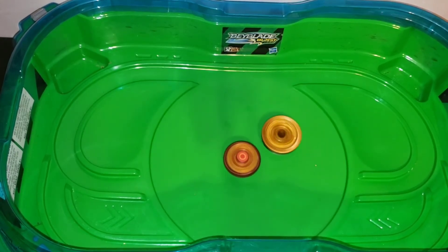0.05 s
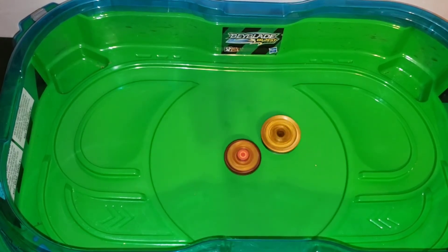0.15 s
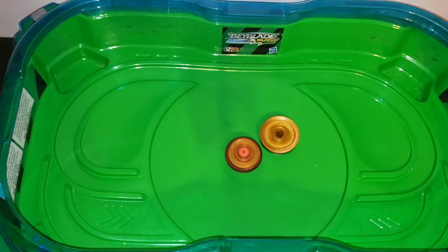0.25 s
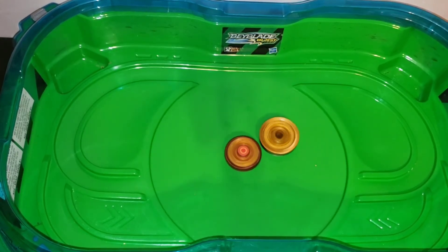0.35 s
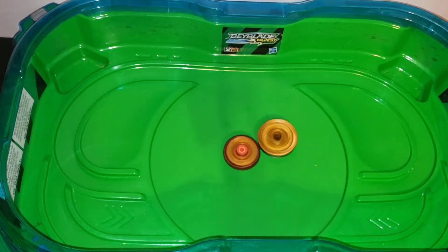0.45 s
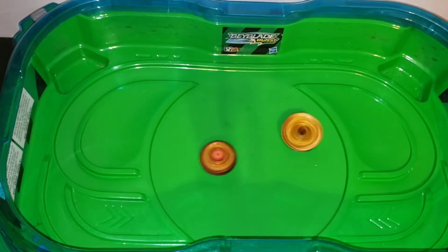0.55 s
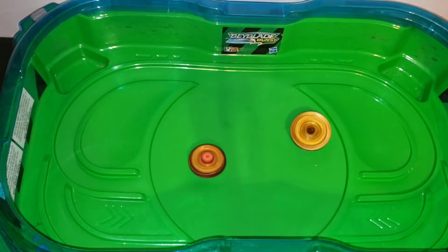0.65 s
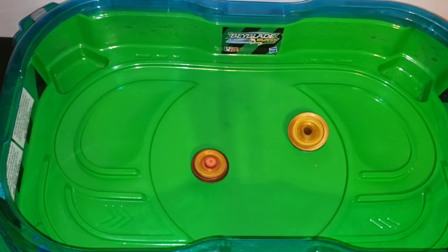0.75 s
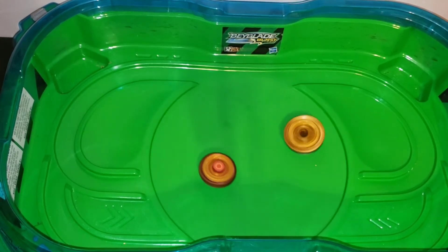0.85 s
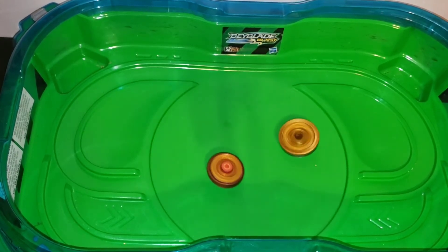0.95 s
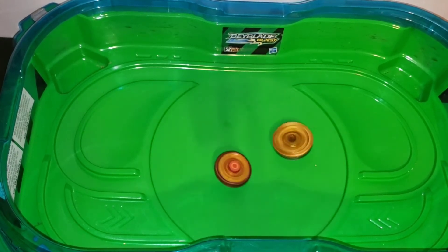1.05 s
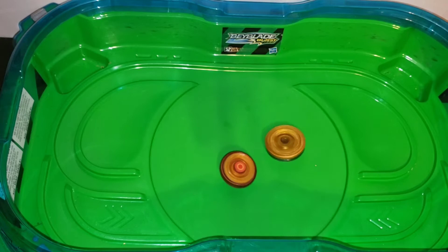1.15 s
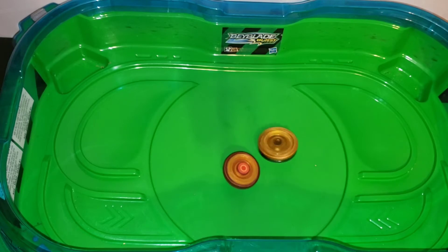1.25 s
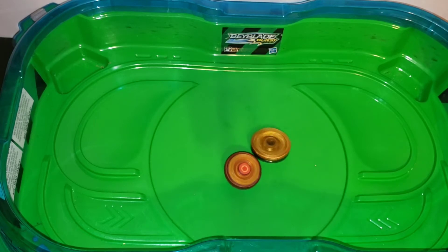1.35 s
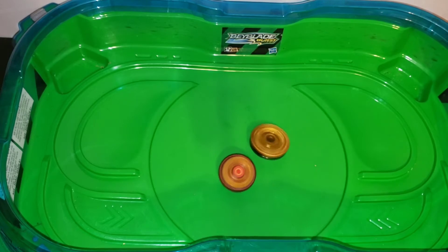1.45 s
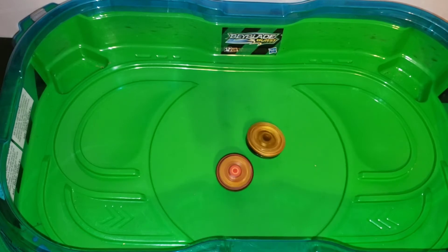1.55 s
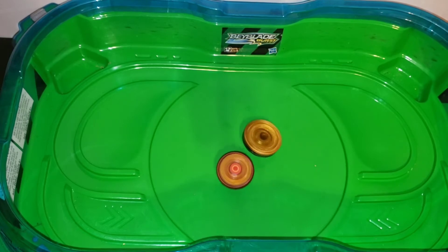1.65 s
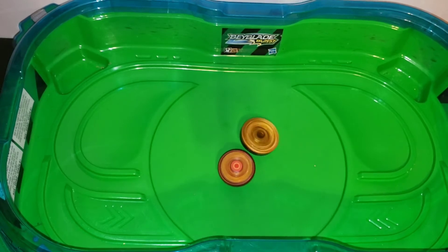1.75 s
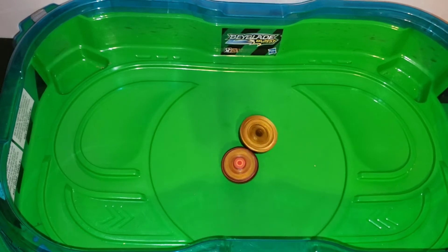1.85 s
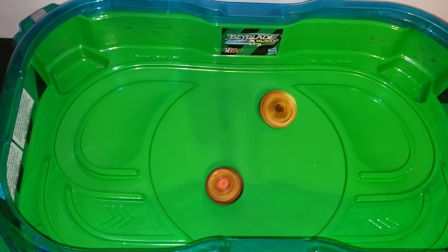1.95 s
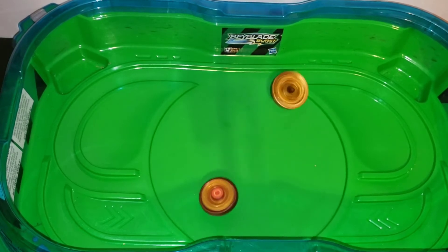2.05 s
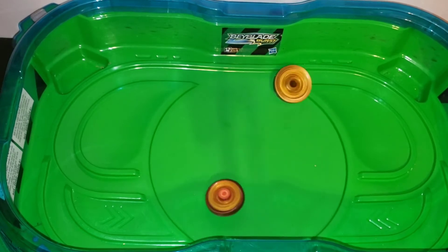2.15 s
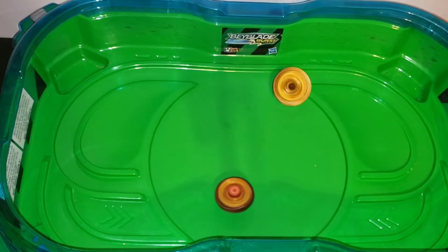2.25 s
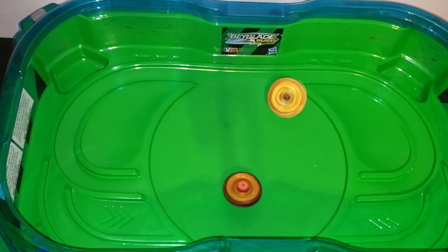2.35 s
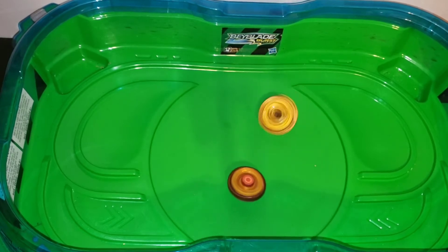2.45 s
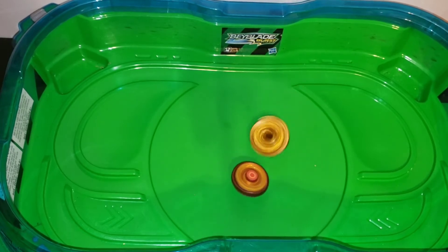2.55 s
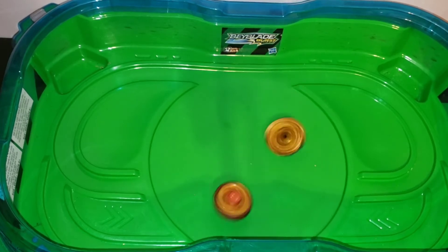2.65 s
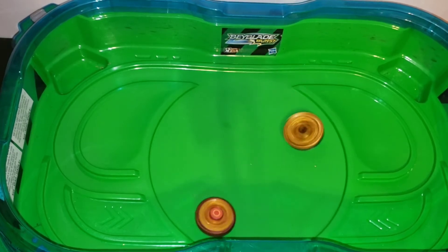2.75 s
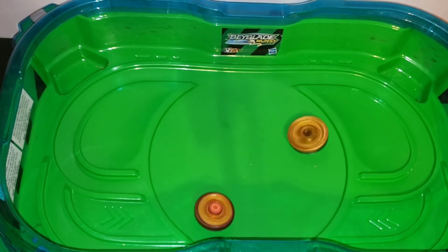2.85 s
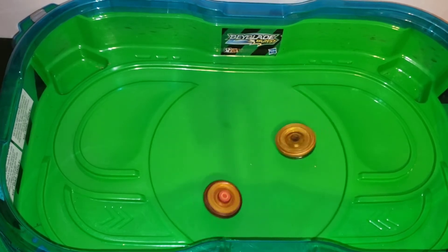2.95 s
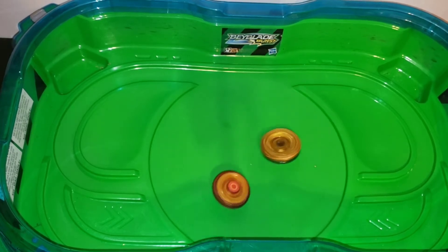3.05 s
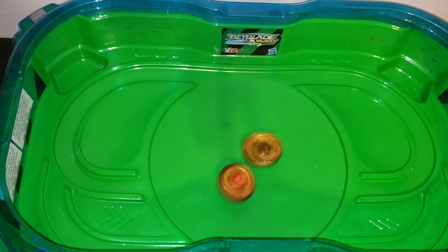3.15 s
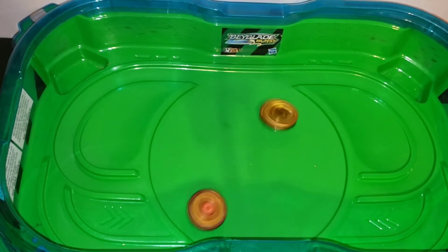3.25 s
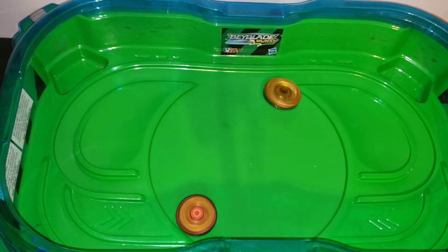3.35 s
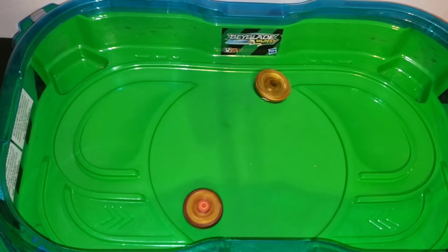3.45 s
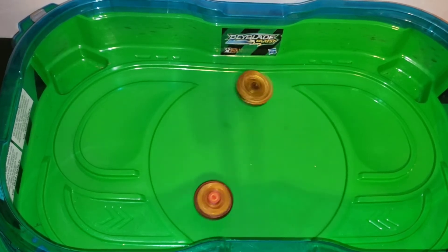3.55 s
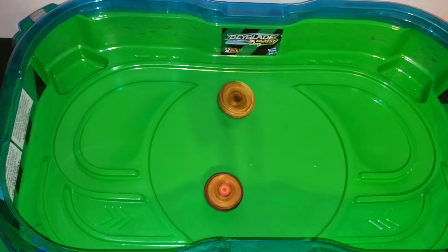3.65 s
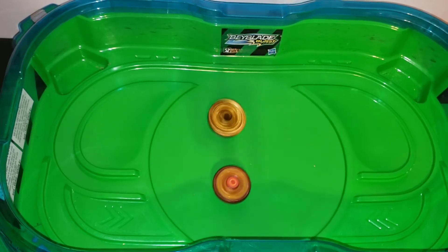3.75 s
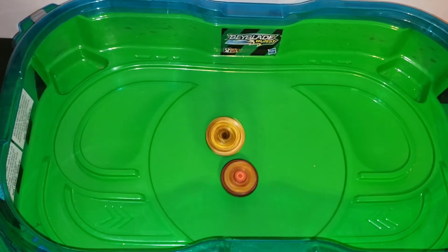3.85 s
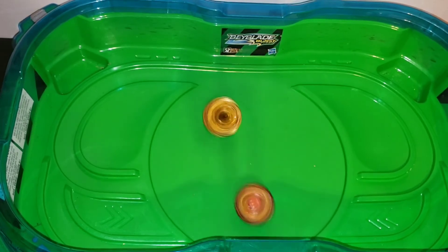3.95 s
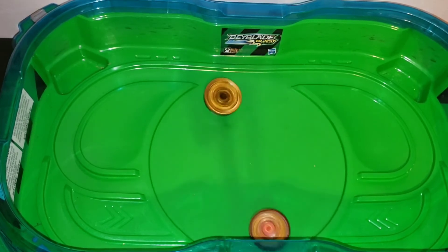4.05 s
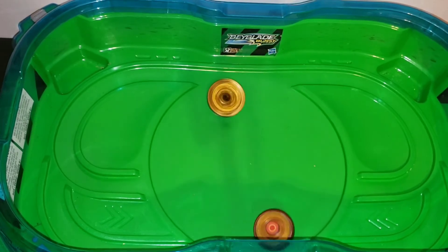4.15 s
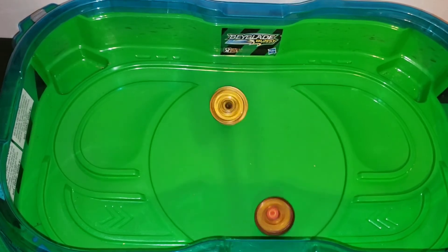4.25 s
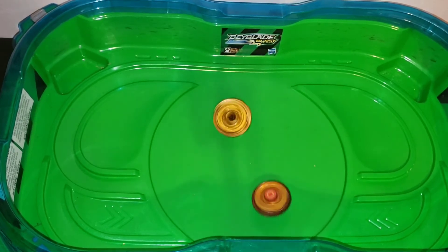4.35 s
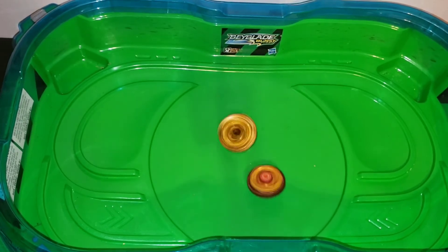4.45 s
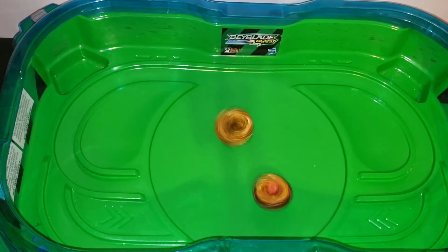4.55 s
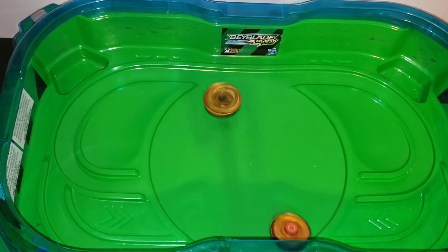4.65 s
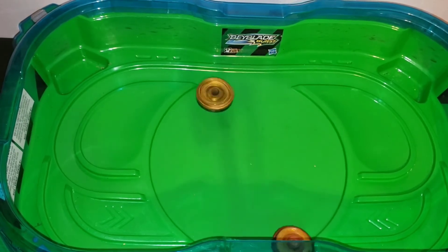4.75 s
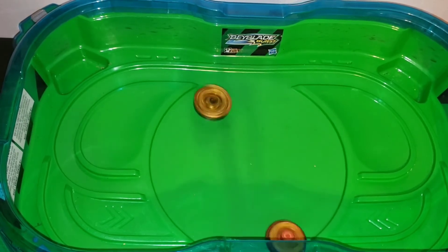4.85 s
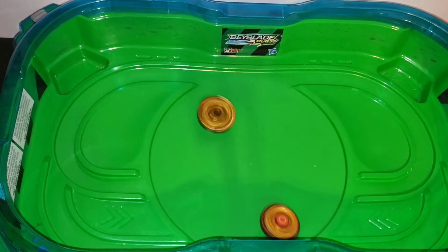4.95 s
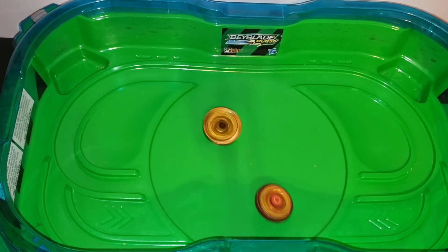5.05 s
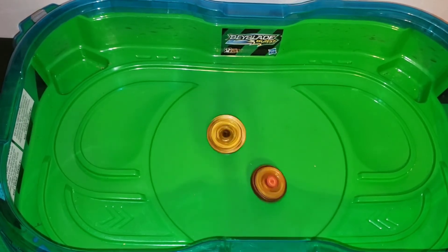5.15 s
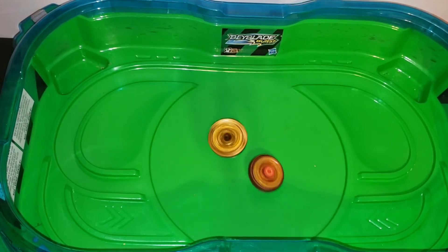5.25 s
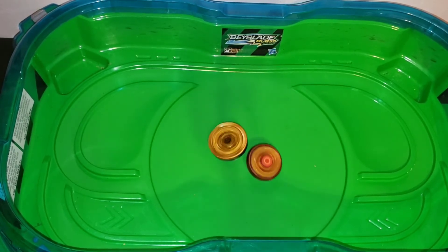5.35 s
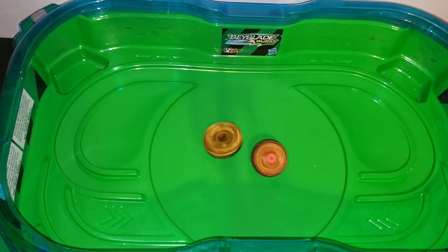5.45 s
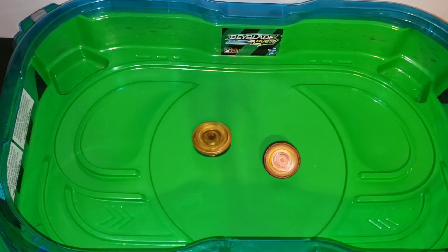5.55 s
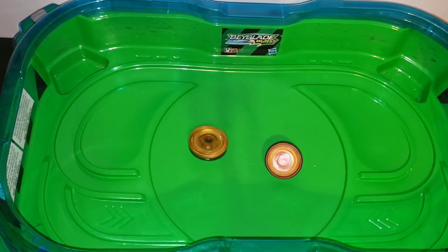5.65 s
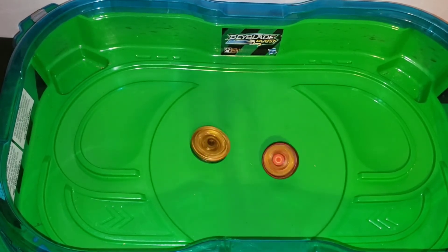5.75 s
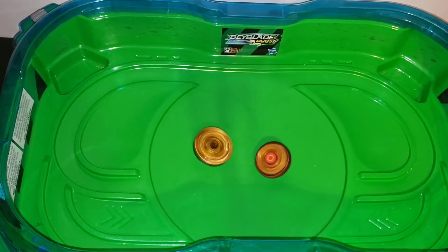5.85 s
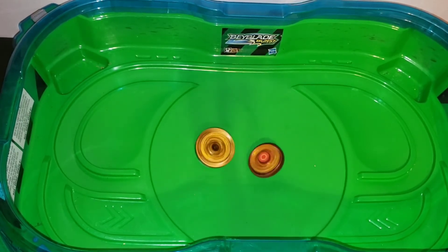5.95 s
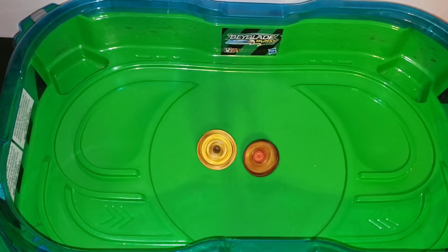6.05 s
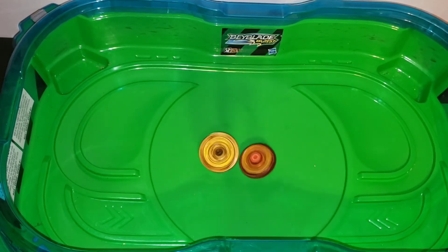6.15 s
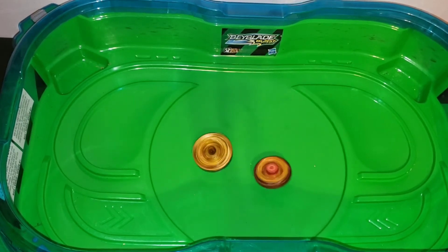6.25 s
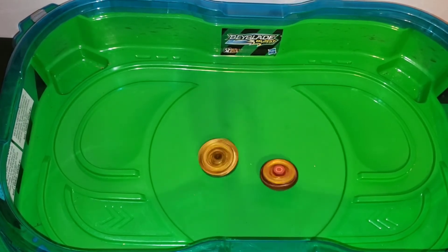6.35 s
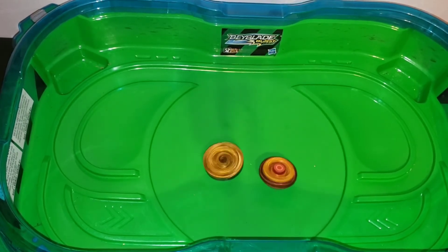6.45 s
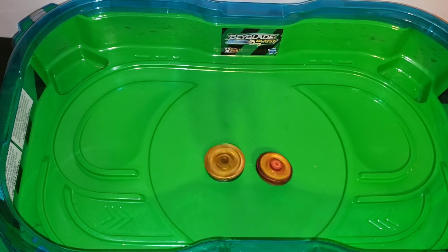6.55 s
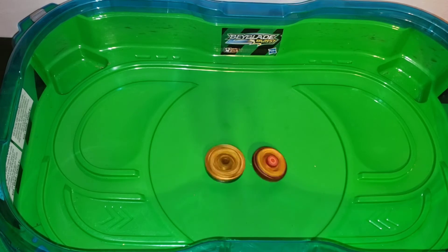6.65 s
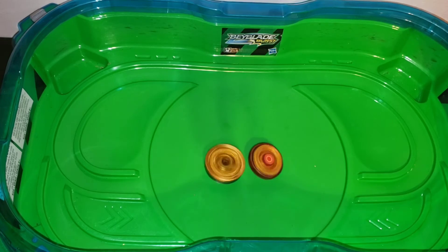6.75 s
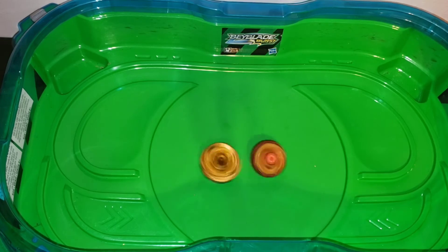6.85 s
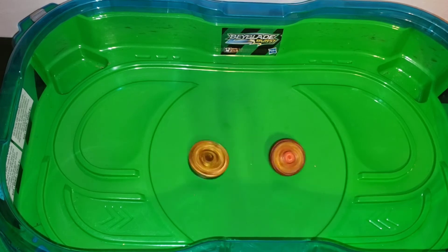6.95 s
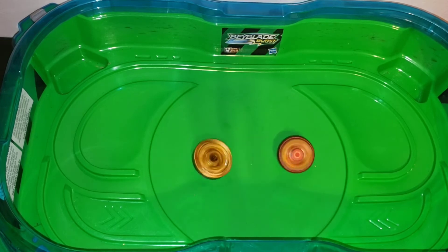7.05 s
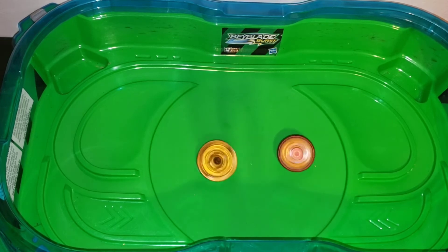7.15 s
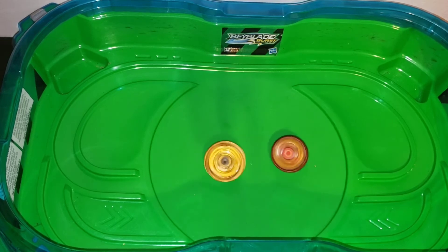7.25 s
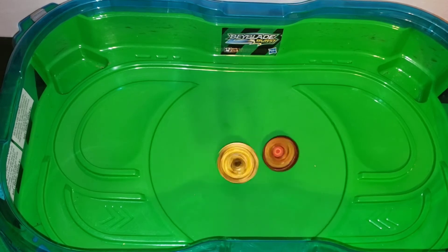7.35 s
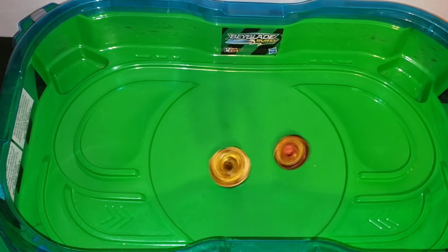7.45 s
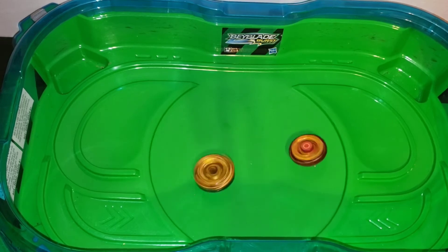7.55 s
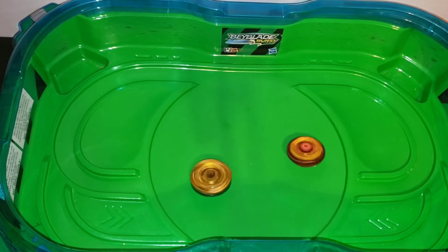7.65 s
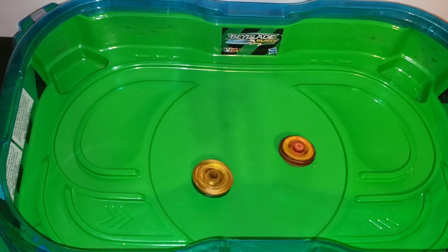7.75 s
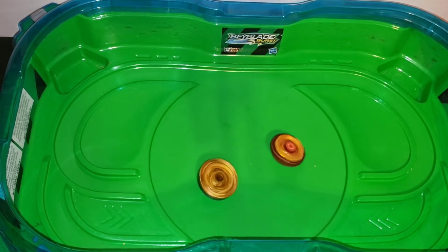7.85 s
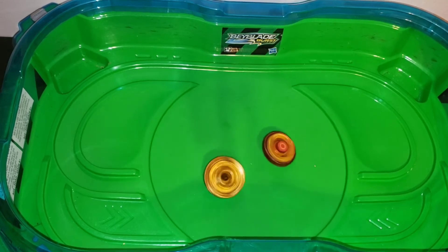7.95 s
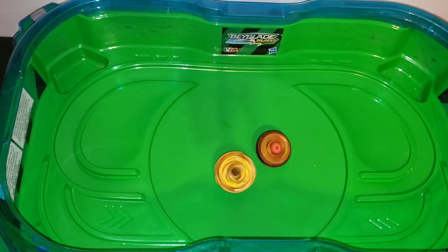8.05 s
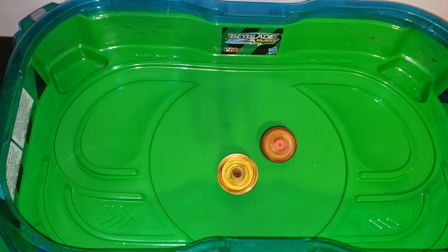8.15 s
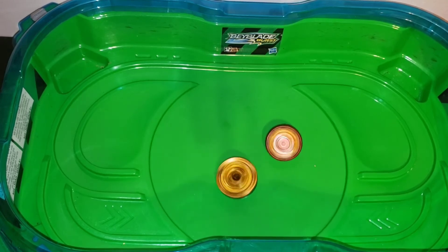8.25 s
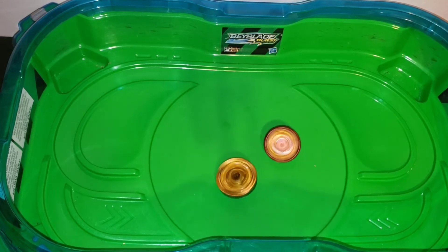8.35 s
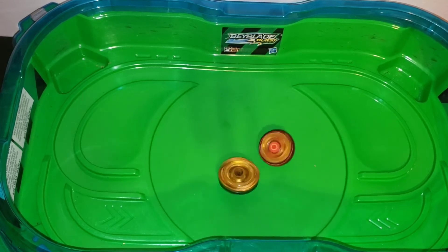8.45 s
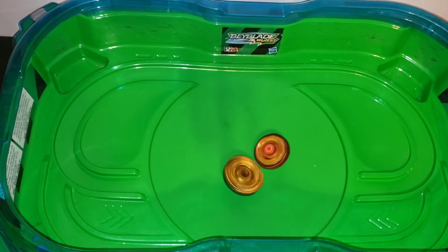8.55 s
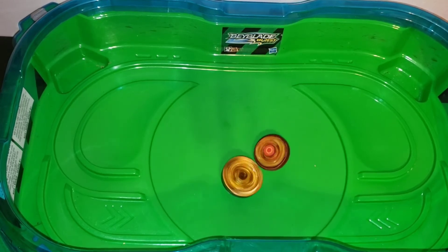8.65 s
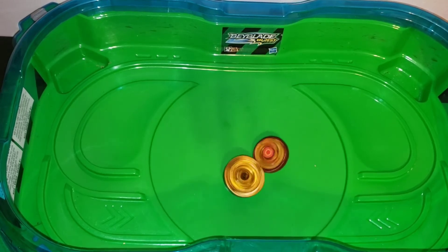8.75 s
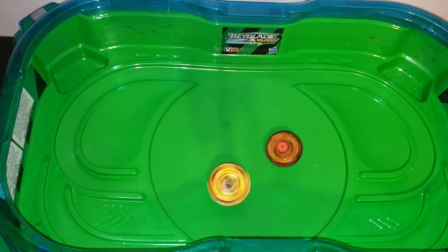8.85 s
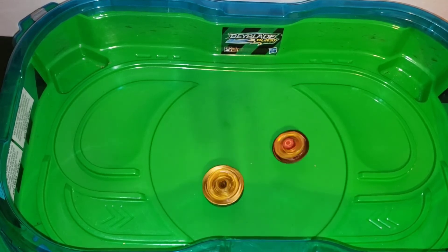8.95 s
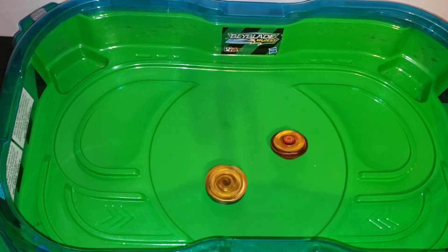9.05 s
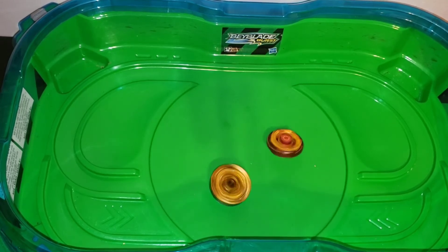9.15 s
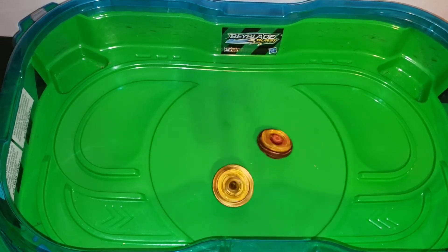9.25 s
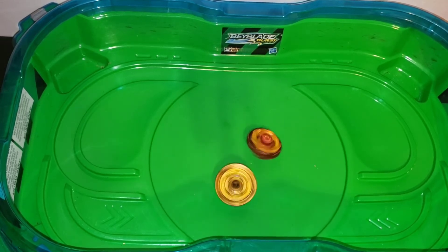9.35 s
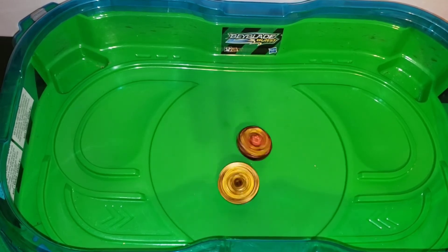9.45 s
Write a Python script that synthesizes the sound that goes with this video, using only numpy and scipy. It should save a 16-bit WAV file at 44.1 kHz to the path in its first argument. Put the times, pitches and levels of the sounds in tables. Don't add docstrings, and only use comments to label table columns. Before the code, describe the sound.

In a quiet room, close up in stereo, two spinning tops move over a thin plastic bowl. A light clack at 0.4 s and a stronger one at 0.5 start a flutter of soft low thuds and scratches, fading by 0.9. Another bright clack at 1.4 leads into a faintly singing scrape until 1.8. Hard clacks at 1.9 and 2.65 set off rapid pattering; more follow at 3.2, 4.0 and 4.6, the last with a hollow knock and heavy thuds. It is nearly still from 4.9 to 5.4. A clack at 5.5 begins slower, louder rattling with small plastic chirps; edge knocks at 6.0 to 6.15 peak in a hard, ringing bang. Clacks at 6.9 and, very sharp, 7.5 bring further wobbling rattles. Weak clacks at 8.2, 8.6 and 8.8 mix with uneven thuds and scratches until 9.5.

```python
import sys
import numpy as np
from scipy import signal
from scipy.fft import rfft, irfft, next_fast_len
from scipy.io import wavfile
from scipy.ndimage import uniform_filter1d

SR = 44100
rng = np.random.default_rng(int(sys.argv[2]) if len(sys.argv) > 2 else 0)


def unload_wav(signal):
    wavfile.write(
        sys.argv[1],
        SR,
        np.round(np.clip(np.atleast_2d(signal).T, -1, 1) * 32767).astype(np.int16),
    )


def undo_db(level):
    steps = np.asarray(level, float) / 20
    return 10 ** steps


N = 418950
T = np.arange(N) / SR
SIZE = next_fast_len(N + 8192)
HZ = np.fft.rfftfreq(SIZE, 1 / SR)

# (time [s], blow [dB], contact time [s], left over right [dB], plastic body sound [dB])
CLACKS = [(0.372, -19.5, 0.01, 2.5, -15), (0.5286, -9.5, 0.0058, 2, -2.5), (1.429, -12, 0.0045, 4, -41),
          (1.9247, -7.5, 0.0038, 2, 1), (2.6478, -5, 0.0053, 1, 5.5), (3.238, -11, 0.005, 2, 11),
          (3.9831, -10, 0.0049, 1.5, 6.5), (4.5993, -9, 0.0027, 2, 6.5), (5.4791, -15.5, 0.0053, 1, 12.5),
          (6.146, -16.5, 0.0043, 1, 6), (6.219, -19.5, 0.002, 1, -4), (6.9215, -13, 0.006, 0, 3),
          (7.4906, -3.5, 0.0014, 2, -17), (8.1917, -28, 0.0045, 0.5, 8), (8.6407, -18.5, 0.0058, -0.5, -5),
          (8.821, -17.5, 0.0018, 1, 0)]
# (time [s], load on the floor [dB], grit under the tips [dB])
SLIDE = [(0.0, -104, -67), (0.45, -43.5, -88), (0.69, -34.5, -63.5), (1.11, -52, -59.5), (2.19, -28, -62),
         (2.42, -43.5, -55), (3.03, -47.5, -63.5), (4.84, -72, -58.5), (5.48, -43, -59), (5.66, -28, -49.5),
         (6.27, -26.5, -47.5), (6.48, -60.5, -59), (6.62, -66.5, -71), (6.85, -69, -60.5),
         (7.06, -31.5, -49.5), (7.86, -60, -69), (8.4, -62, -54), (8.85, -23.5, -48.5), (9.04, -63, -60.5),
         (9.2, -43, -54), (9.5, -27, -51)]
# (time [s], pitch of the broad floor tone [Hz], lean to the stiff side [dB])
PLACE = [(0, 109, -18), (.7, 116, 8), (1.2, 113, 23), (1.6, 115.6, 11), (2.2, 141, 6.5), (2.6, 113.8, 2),
         (3.6, 143, -15), (4.2, 135.6, 13), (4.6, 107.6, -37), (4.8, 142, -11), (5.3, 125, 12),
         (5.7, 106.3, 12.5), (6.4, 119, 10.5), (7.0, 108.5, 11.5), (7.3, 133.5, 31), (7.62, 106.3, 15),
         (8.1, 123.3, 30.5), (9.5, 129.6, 21)]


def evened(x):
    return x / np.sqrt(np.mean(x ** 2) + 1e-20)


def read(points, hz):
    f, value = np.transpose(points)
    return np.interp(np.log(hz + 1), np.log(f + 1), value)


def curve(table, column):
    rows = np.array(table, float)
    return np.interp(T, rows[:, 0], rows[:, column])


def colour(x, gain):
    return irfft(rfft(x, SIZE) * gain, SIZE)[..., :N]


def add(mix, s, sound):
    part = mix[..., round(s * SR):][..., :sound.shape[-1]]
    part += sound[..., :part.shape[-1]]


def ring(modes, seconds, extra_db=0., phase=0.):
    t = np.arange(round(seconds * SR))[:, None] / SR
    hz, db, t60 = np.transpose(modes)
    loudness = undo_db(db + extra_db - 60 * t / t60)
    return (loudness * np.sin(2 * np.pi * hz * t + phase)).sum(1)


def peaks(modes):
    gain = 0
    for k, (f, width, db) in enumerate(modes):
        gain = gain + (-1) ** k * undo_db(db) / (1 + 2j * (HZ - f) / width)
    return gain / np.sqrt(np.mean(abs(gain) ** 2))


def chance():
    # (frequency [Hz], likeness [0-1])
    likeness = [(60, 1), (300, 0.5), (550, 0.61), (1600, 0.11), (5000, 0.05), (15000, 0.2)]
    a, b = rng.standard_normal((2, len(HZ), 2)) @ [1, 1j]
    same = np.clip(read(likeness, HZ), 0, 1)
    return np.array([a, same * a + np.sqrt(1 - same ** 2) * b])


def shaped(noise, points):
    return evened(irfft(noise * undo_db(read(points, HZ)), SIZE)[:, :N])


def levelled(x, tone, window):
    z = rfft(x)
    lumps = np.sqrt(uniform_filter1d(abs(z / tone) ** 2, size=40, axis=1))
    y = irfft(z / lumps) * window
    return y * np.linalg.norm(x) / np.linalg.norm(y)


def train(times, levels_db, shape):
    clicks = np.zeros(N)
    np.add.at(clicks, (times * SR).astype(int), undo_db(levels_db))
    return signal.oaconvolve(clicks, shape)[:N]


def clacks():
    # (frequency [Hz], level [dB])
    crack_tone = [(290, -49), (500, -26.5), (1410, -18), (4170, -1), (4690, -0.5), (5430, -1.5), (7710, -7),
                  (8540, -13), (14700, -7.5), (16800, -16)]
    # (time [s], pitch [Hz], level [dB], other pitch [Hz], level [dB])
    favoured = [(0.3716, 4180, -24, 5460, -18.5), (0.5292, 4200, -16, 5460, -21),
                (1.4284, 4180, -20, 7000, -23), (1.9235, 4200, -21, 5460, -20.5),
                (2.6469, 2490, -11.5, 5460, -21), (3.2385, 4200, -20, 7100, -20.5),
                (3.9818, 3330, -24, 4200, -16), (4.5984, 3330, -29.5, 7000, -27),
                (5.4779, 4200, -23.5, 5460, -20.5), (6.1454, 3400, -33, 5700, -26),
                (6.2183, 2460, -30, 4200, -28), (6.9227, 4200, -24, 5500, -16.5),
                (7.4909, 4200, -29, 7000, -23), (8.1898, 4200, -29, 5460, -32),
                (8.6408, 2830, -29, 7000, -44), (8.8204, 3450, -34, 7000, -32)]
    lead_ins_db = [-18.5, -32, -21, -44, -45.5, -31, -30.5, -26, -49, -32, -33, -43, -37.5, -41, -16.5, -20]
    # (frequency [Hz], level [dB], time to fall 60 dB [s])
    rim_groups = [
        [(2330, -7, .035), (2465, -5, .045), (2680, -7, .035)],
        [(3170, -6, .06), (3490, 1, .08)],
        [(4110, -1, .07), (4250, -4, .04)],
        [(5320, -6, .05), (5490, -3, .07), (5590, -2, .07)],
        [(6550, -3, .09), (6995, -4, .08), (7700, -3, .06)],
    ]
    out, rings, t = np.zeros((2, N)), np.zeros((2, N)), np.arange(8192) / SR
    hz, lead = np.fft.rfftfreq(len(t), 1 / SR), np.arange(-1000, 0) / SR
    fade = (1 - np.exp(-t / 0.00074)) * np.cos(np.pi / 2 * t / t[-1])
    fade = fade * (.07 + .93 * np.exp(-t / .018))
    for blow, pitches, lead_in_db in zip(CLACKS, favoured, lead_ins_db):
        s, db, contact_s, pan_db, body_db = blow
        _, hz_a, db_a, hz_b, db_b = pitches
        side = undo_db(np.array([[pan_db - 1.5], [1.5 - pan_db]]) / 2)
        tone = undo_db(read(crack_tone, hz) + body_db / (1 + (hz / 2300) ** 6))
        shape = (1 - np.exp(-t / .001)) ** 2 * np.exp(-t / max(contact_s, .001))
        crack = evened(irfft(rfft(rng.standard_normal((2, len(t)))) * tone))
        crack[1] = 0.42 * crack[0] + crack[1]
        burst = levelled(crack * shape / shape.max(), tone, shape ** 0.14)
        add(out, s - .001, side * undo_db(db - 5.5) * burst)
        add(out, s + lead[0], side * undo_db(db + lead_in_db) * crack[:, -len(lead):] * np.exp(lead / 0.004))
        spin_hz = 56 * (1 - 0.014 * s)
        for modes in rim_groups:
            octaves_off = abs(np.log2(np.mean(modes, axis=0)[0] / np.array([hz_a, hz_b])))
            group_db = max(np.array([db_a, db_b]) - 60 * octaves_off) + 5.5
            phases = rng.random(len(modes)) + np.array([[0], [.15]])
            rim = np.array([ring(modes, len(t) / SR, group_db, 2 * np.pi * p) for p in phases])
            turning = 1 + .8 * np.sin(2 * np.pi * (spin_hz * t + rng.random()))
            add(rings, s - .001, side * rim * turning * fade)
    return out, rings


def notes():
    # (time [s], level [dB])
    taps = [(5.5503, -38), (5.5997, -39), (5.6476, -41), (5.7059, -38), (5.7508, -38), (5.7977, -40),
            (5.8471, -33.5), (5.9095, -37), (5.9409, -41), (6.9721, -34), (7.0364, -40), (7.0798, -37),
            (7.1546, -31.5), (7.219, -31.5), (7.5487, -34.5), (7.9578, -40.5), (8.2866, -42.5),
            (8.3704, -36), (8.4148, -41), (8.5285, -40.5), (8.5584, -43), (8.6444, -33), (8.6794, -43),
            (8.7256, -44), (8.773, -54), (8.8593, -54), (8.9306, -40.5), (9.0743, -42), (9.1596, -39.5),
            (9.1995, -38), (9.3317, -43), (9.4699, -57)]
    # (frequency [Hz], level [dB], time to fall 60 dB [s])
    stiff = [(2270, -3.5, 0.11), (2341, 2, 0.068), (2516, -3, 0.095)]
    # (time [s], frequency [Hz], level [dB], time to fall 60 dB [s])
    rim_notes = [(.372, 3495, -33, 0.36), (.372, 3520, -27, .05), (0.373, 4170, -32, 0.14),
                 (.372, 5529, -34, 0.15), (.372, 6580, -34, .1), (.529, 3485, -25, 0.3),
                 (.529, 3900, -39, .12), (.529, 5470, -36, .11), (1.427, 4177, -33, 0.18),
                 (2.647, 5500, -28, .2), (1.924, 3485, -29, .18), (3.982, 3485, -30, .25),
                 (6.922, 3510, -33, .18), (1.427, 8000, -27, .04), (.529, 7000, -25, .05),
                 (6.219, 4300, -27, .03), (7.49, 4740, -24, .03), (1.924, 6590, -30, .06),
                 (2.647, 3630, -25, .04), (2.647, 4740, -22, .035), (2.647, 6400, -23, .04),
                 (3.238, 4760, -21, .04), (3.238, 7400, -24, .04), (3.982, 5490, -26, .06),
                 (4.599, 3200, -19, .025), (7.49, 5770, -23, .04), (7.49, 6300, -23, .04),
                 (8.19, 3430, -40, .035), (8.19, 5200, -37, .035), (8.64, 4830, -27, .04),
                 (8.191, 4237, -40, 0.12), (1.427, 3200, -36, .1), (3.238, 2840, -28, .03),
                 (8.641, 3565, -38, .3), (8.821, 3565, -37, 0.17)]
    out, t, beat_hz = np.zeros((2, N)), np.arange(SR // 4) / SR, 22
    chirp_rise = 1 - np.exp(-t[:SR // 10] / 0.00077)
    for s, db in taps:
        p = 2 * np.pi * rng.random((2, len(stiff)))
        chirp = np.array([ring(stiff, .1, db, q) for q in (p[0], p[0] + 0.21 * p[1])])
        add(out, s, chirp * chirp_rise)
    for s, *mode in rim_notes:
        beat = 1 + .5 * np.cos(2 * np.pi * (beat_hz * t + rng.random()))
        note = ring([mode], .25) * beat * np.cos(2 * np.pi * t)
        add(out, s, note * np.ones((2, 1)))
    return out


def knocks():
    # (time [s], blow [dB], brightness [dB per octave])
    blows = [
        (0.529, -24, -6),
        (4.601, -20.5, -2.5),
        (6.015, -27.5, -22),
        (6.06, -13.5, -10),
        (6.147, -4, 2),
    ]
    # (frequency [Hz], level [dB], time to fall 60 dB [s])
    wall = [(225, -5, 0.046), (304, 3.5, 0.1), (408, -3, 0.21), (514, -10.5, 0.083), (567, -10.5, .08),
            (672, -5, 0.1), (875, -5.5, 0.13), (973, -10, 0.18), (1120, -9, 0.029), (1450, -19, .05)]
    octaves = np.log2(np.array(wall)[:, 0] / wall[2][0])
    out = np.zeros(N)
    for s, db, tilt_db in blows:
        spot_db = 1.5 * rng.standard_normal(len(wall))
        body = ring(wall, 0.31, spot_db + tilt_db * octaves)
        body = np.convolve(body, signal.windows.hann(round(.0008 * SR)))
        add(out, s, undo_db(db + 2) * body / abs(body).max())
    return out


def landings():
    # (first hop [s], last hop [s], hops [count], thud [dB], scratch over thud [dB])
    runs = [
        (0.534, 0.601, 3, -29.5, -5),
        (1.84, 1.909, 3, -42, -11),
        (3.113, 3.209, 4, -33, -16.5),
        (6.756, 6.899, 5, -43, -9.5),
        (7.984, 8.132, 4, -33.5, -14.5),
    ]
    # (time [s], thud [dB], scratch over thud [dB])
    stumbles = [(0.369, -34.5, -13), (1.362, -43, -22), (1.4, -41, -17), (1.431, -33.5, -8),
                (1.934, -37, 6), (2.213, -28.5, -2.5), (2.649, -26.5, -8.5), (2.69, -21, -6.5),
                (2.718, -26.5, -3.5), (3.255, -26.5, -10), (3.98, -35, 4.5), (4.603, -17.5, -2),
                (4.689, -18.5, -7.5), (4.747, -19, -2.5), (5.181, -65, -7), (5.274, -63, -3.5),
                (5.318, -54.5, -9), (5.415, -61, -17), (5.48, -28.5, -7), (5.515, -20, -14),
                (5.908, -34.5, -1), (5.949, -35, -14), (6.009, -31.5, -2.5), (6.058, -20.5, -0.5),
                (6.147, -20.5, 6), (6.635, -60, -7), (6.686, -58, -6), (6.926, -28.5, -5.5),
                (7.155, -33, -11.5), (7.473, -31.5, -19), (7.957, -34.5, -4), (8.201, -33.5, -15),
                (8.286, -30.5, -4), (8.527, -30, -7.5), (8.557, -29.5, -12), (8.609, -30, -8),
                (8.927, -26, -8), (9.072, -37.5, -8), (9.33, -25, -8.5)]
    # (time [s], scratch
    # [dB], thud [dB])
    hop_list = [(0.657, -34, -33), (0.69, -26, -29.5), (0.719, -27.5, -29.5), (0.751, -27, -27.5),
                   (0.784, -29, -30), (0.814, -31, -31.5), (0.847, -32.5, -32.5), (0.875, -34.5, -41.5),
                   (0.903, -44, -36), (1.448, -30, -34.5), (1.482, -38, -34.5), (1.516, -31, -38),
                   (1.55, -31, -34.5), (1.586, -28.5, -32.5), (1.617, -29, -32.5), (1.649, -29, -39),
                   (1.683, -30, -35), (1.716, -33, -41.5), (1.75, -33, -32), (1.782, -40.5, -43),
                   (2.008, -32, -36), (2.047, -25.5, -30), (2.077, -25, -41), (2.114, -23, -31.5),
                   (2.145, -26.5, -37), (2.178, -25, -32.5), (2.246, -29, -33.5), (2.277, -33.5, -36),
                   (2.31, -37, -38.5), (2.343, -38.5, -36.5), (2.377, -45, -40), (2.404, -63, -42),
                   (2.435, -78, -52.5), (4.115, -40.5, -42), (4.147, -39, -38), (4.192, -30.5, -32.5),
                   (4.235, -24.5, -28.5), (4.282, -26.5, -35.5), (4.317, -26, -30.5), (4.361, -35, -40),
                   (4.408, -46, -40), (4.632, -41, -33), (4.664, -20.5, -35.5), (4.718, -22, -26.5),
                   (4.776, -23, -32), (4.807, -27.5, -26.5), (4.844, -27.5, -29), (4.873, -35.5, -42),
                   (4.901, -55, -37.5),
                   (2.749, -25, -34), (2.778, -24.5, -27), (2.817, -25, -27), (2.847, -30.5, -25.5),
                   (2.876, -43, -39.5), (2.909, -65, -44), (3.281, -35, -30), (3.315, -36, -30),
                   (3.347, -28.5, -34), (3.38, -29.5, -31.5), (3.413, -39, -36.5), (3.447, -39, -40),
                   (3.48, -40, -39), (3.514, -43, -41.5), (3.569, -35.5, -41), (3.603, -29.5, -32.5),
                   (3.636, -31.5, -32.5), (3.669, -32.5, -34.5), (3.698, -28.5, -29), (3.731, -38, -33.5),
                   (3.765, -46, -44),
                   (5.495, -22, -28), (5.55, -23.5, -26), (5.6, -20.5, -22), (5.648, -20.5, -22.5),
                (5.703, -23, -23.5), (5.75, -22.5, -23.5), (5.804, -25.5, -23.5), (5.845, -29, -24),
                (6.233, -14, -18.5), (6.282, -19, -21), (6.327, -20.5, -22.5), (6.374, -23, -24.5),
                (6.419, -34.5, -32.5), (6.971, -23.5, -26), (7.013, -20, -22), (7.037, -25.5, -25.5),
                (7.08, -25, -28), (7.111, -35.5, -30.5), (7.152, -26.5, -26), (7.193, -26, -28),
                (7.217, -28.5, -29.5), (7.253, -49.5, -28.5), (7.29, -65.5, -56), (7.502, -21, -27),
                (7.548, -18, -19.5), (7.599, -25, -23.5), (7.627, -47, -45), (7.658, -45, -41), (7.7, -52, -40),
                (8.33, -47.5, -33.5), (8.37, -24.5, -30), (8.412, -25.5, -24.5), (8.453, -30, -33),
                (8.495, -65, -35), (8.642, -25.5, -26.5), (8.679, -31, -30.5), (8.724, -26.5, -29),
                (8.775, -27.5, -28.5), (8.821, -25.5, -47), (8.866, -24.5, -27), (8.972, -42, -33.5),
                (9.119, -55, -39.5), (9.162, -30.5, -31.5), (9.2, -26, -27.5), (9.246, -34.5, -31),
                (9.27, -49.5, -43), (9.302, -41, -37), (9.376, -37.5, -51), (9.393, -36.5, -36),
                (9.428, -37.5, -53), (9.468, -29, -31.5)]
    count, swell_s, struck_s = 16, .055, .06
    start, last, hops, thud_db, over_db = np.transpose(runs)[:, :, None]
    time_luck, thud_luck, over_luck = rng.standard_normal((3, len(runs), count))
    turn = (last - start) / (np.round(hops) - 1)
    since, length = np.arange(count) * turn, last - start + turn / 2
    after = start - np.array(CLACKS)[:, 0]
    struck = abs(after - struck_s / 2) < struck_s / 2 + turn / 4
    free = ~struck.any(axis=1, keepdims=True)
    swell = np.exp(-since / swell_s)
    dying = (since / length) ** 3
    thud_db = thud_db - 11 * free * swell
    rows = np.array([start + since + .0008 * time_luck,
                     thud_db - 12.5 * dying + 2.2 * thud_luck,
                     over_db - 3.5 * swell - 16.5 * dying + 2.5 * over_luck])
    s, scratch_db, heavy_db = np.transpose(hop_list)
    scratch_db, heavy_db = scratch_db - 5.5, heavy_db + 4
    listed = [s, heavy_db, scratch_db - heavy_db]
    in_run = (since < length) & (rows[0] < T[-1])
    return np.hstack([rows[:, in_run], np.transpose(stumbles), listed])


def thuds(landed):
    # (frequency [Hz], level [dB], time to fall 60 dB [s])
    floor = [(64.7, 1.5, 0.29), (131.4, -7.5, 0.44), (184.3, -10, 0.12), (240, -9, 0.092),
             (294, -23.5, 0.026)]
    # (time [s], level [dB])
    deep_answer = [(0, 2), (.5, -14), (1.2, 19.5), (1.6, 2), (2.3, 8.5), (2.65, 4.5), (3, -6.5),
                   (4.1, -0.5), (4.8, -11), (5.6, -6.5), (6.2, -10.5), (7.5, -11.5), (8.3, -17), (9.5, -1)]
    push = signal.windows.hann(round(.0033 * SR))
    hops = undo_db(-6.5) * train(landed[0], landed[1] + 4, push / push.sum())
    drive = hops + undo_db(curve(SLIDE, 1) - 36) * rng.standard_normal(N)
    body = signal.oaconvolve(drive, ring(floor[1:], .4))[:N]
    deep_db = -7 + 1.31 * T - 0.1 * curve(PLACE, 2) + curve(deep_answer, 1)
    deep = signal.oaconvolve(drive * undo_db(deep_db), ring(floor[:1], .5))[:N]
    turn = np.exp(2j * np.pi * np.cumsum(curve(PLACE, 1)) / SR)
    width_hz = 18.1
    main = (turn * signal.lfilter([1], [1, -np.exp(-np.pi * width_hz / SR)], drive / turn)).imag
    return body + deep + undo_db(6) * main


def scratches(landed):
    # (frequency [Hz], level [dB])
    scrape_tone = [(350, -28.5), (550, -24), (1000, -11), (2000, -9), (3500, -16.5), (7000, -33)]
    fizz_tone = [(2000, -7), (3000, -1), (6500, 1), (7700, -3.5), (8500, -28), (11000, -48.5)]
    air_tone = [(6500, -24.5), (8300, -4.5), (12000, 8.5), (15500, 3.5), (16300, -8)]
    # (frequency [Hz], width [Hz], level [dB])
    bowl = [(410, 30, -2), (507, 320, -7), (668.4, 89, 1.5), (918, 53, -3.5), (1108, 160, -6.5),
            (1453, 29, -5), (1703, 16, -7.5), (1880, 34, -21)]
    # (frequency [Hz], width [Hz], level [dB])
    low_patch, stiff_patch = [
        [(759, 30, 0)],
        [(2156, 13, -0.5), (2376, 30, -1), (2440, 18, -7.5)],
    ]
    # (time [s], level [dB])
    sing = [
        (1.4, -18.5),
        (1.5, -3),
        (1.78, 5.5),
        (1.84, -22),
        (1.93, -11.5),
        (2.0, -22),
    ]
    # (frequency [Hz], width [Hz], level [dB])
    middle = [(760, 27, -6.5), (1156, 34, -5)]
    t, noise = np.arange(SR // 5) / SR, chance()
    times, thud_db, over_db = landed
    scratch_db, lean_db = thud_db + over_db, curve(PLACE, 2)
    load_db, grit_db = curve(SLIDE, 1) + 55, curve(SLIDE, 2) + 55
    rise = 1 - np.exp(-t / .00042)
    burst = train(times, scratch_db - 1.5, rise * undo_db(-60 * t / .095))
    tick = train(times, scratch_db - 1.5, rise * undo_db(-60 * t / .0033))
    slow = uniform_filter1d(uniform_filter1d(rng.standard_normal(N), 900), 900)
    wander = undo_db(2.5 * evened(slow))
    scrape = undo_db(-57 + 0.22 * load_db + 0.79 * grit_db) * wander
    jump = (burst + 2 * tick) / (uniform_filter1d(burst, SR // 4) + scrape)
    rub, grit = scrape + burst, evened(irfft(chance(), SIZE)[:, :N])
    heave_shape = (1 - np.exp(-t / 0.019)) * undo_db(-60 * t / .1)
    heave = undo_db(-7) * scrape + train(times, scratch_db + 5.5, heave_shape)
    out = undo_db(-2.5) * (0.77 * rub + 0.29 * tick) * shaped(noise, scrape_tone)
    out += colour(heave * grit, peaks(bowl))
    out += colour(undo_db(0.055 * lean_db - 9.5) * rub * grit, peaks(low_patch))
    out += colour(undo_db(0.38 * lean_db - 17) * rub * grit, peaks(stiff_patch))
    out += colour(undo_db(curve(sing, 1) - 6) * rub * grit, peaks(middle))
    out += undo_db(curve(SLIDE, 2)) * (0.69 * wander + 1.2 * jump) * shaped(noise, fizz_tone)
    return out + undo_db(-66 + 1.5 * grit_db) * (1 + 0.97 * jump) * shaped(noise, air_tone)


def room(x):
    # (frequency [Hz], time to fall 60 dB [s])
    decay = [(300, 0.6), (2000, 0.4), (5300, 0.28), (14000, 0.27)]
    taps = np.zeros((2, SR // 2))
    at = np.arange(round(.004 * SR), SR // 2 - 16, 16) + rng.integers(0, 16, (2, 1))
    at = at + rng.integers(-7, 1, at.shape)
    np.put_along_axis(taps, at, rng.choice([-1., 1.], at.shape), 1)
    hz, t, z = signal.stft(taps, SR, nperseg=256)
    tail = signal.istft(z * undo_db(-60 * t / read(decay, hz)[:, None]), SR, nperseg=256)[1]
    return signal.oaconvolve(x, tail / np.linalg.norm(tail[0]), axes=1)[:, :N]


def still_room():
    # (frequency [Hz], level [dB])
    hush = [(15, -50.5), (25, 11), (111, 11.5), (378, -30.5), (1150, -43.5), (2150, -34), (2980, -33.5),
            (3910, -31), (16500, -36.5)]
    # (frequency [Hz], level [dB])
    launch = [(40, -27), (65, 9), (120, -24), (230, -1), (400, -12), (520, -27)]
    noise = chance()
    return undo_db(-54) * shaped(noise, hush) + undo_db(-60 - 8.6 * T) * shaped(noise, launch)


def scene():
    cracks, rings = clacks()
    edges, landed = knocks(), landings()
    echoes = undo_db(-2) * room(cracks + .35 * rings + 0.3 * edges)
    blows = cracks + rings + edges + notes()
    return blows + echoes + thuds(landed) + scratches(landed) + still_room()


def low_pass(x):
    return signal.sosfilt(signal.butter(12, 16820, fs=SR, output="sos"), x)


def record(dry):
    # (frequency [Hz], difference [dB])
    left_lean = [(40, 4.5), (150, 3.5), (500, 2), (3000, 2), (6500, 0), (9000, 13), (14000, 1.5)]
    # (frequency [Hz], level [dB])
    top_edge = [(15700, -2.5), (16000, -19), (16800, -24.5)]
    lean_db = read(left_lean, HZ) / 2
    bass_cut = signal.sosfilt(signal.butter(5, 56., "high", fs=SR, output="sos"), dry)
    mix = colour(bass_cut, undo_db(read(top_edge, HZ) + np.array([lean_db, -lean_db])))
    return low_pass(mix)


dry = scene()
out = record(dry)
unload_wav(out)
```